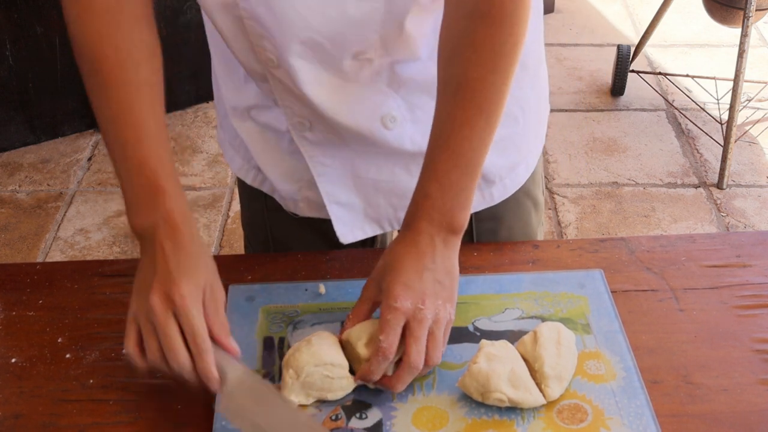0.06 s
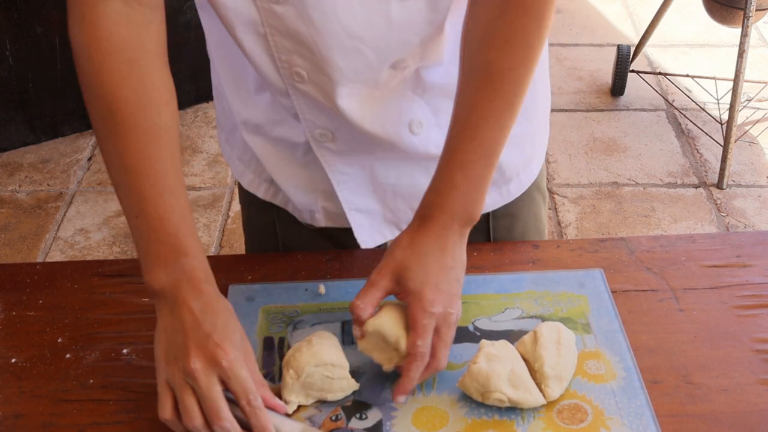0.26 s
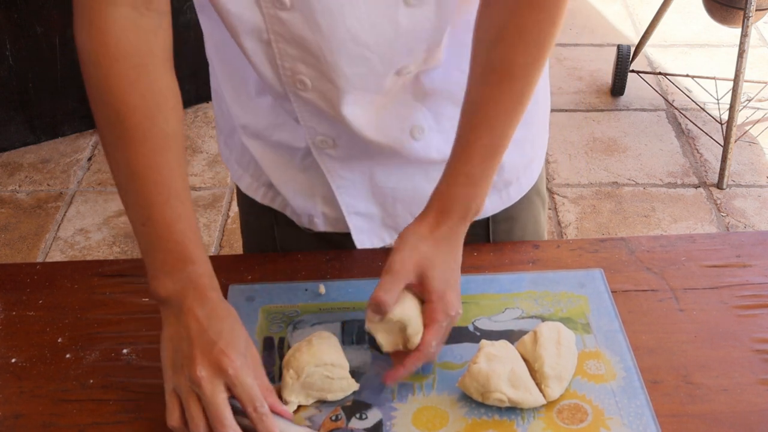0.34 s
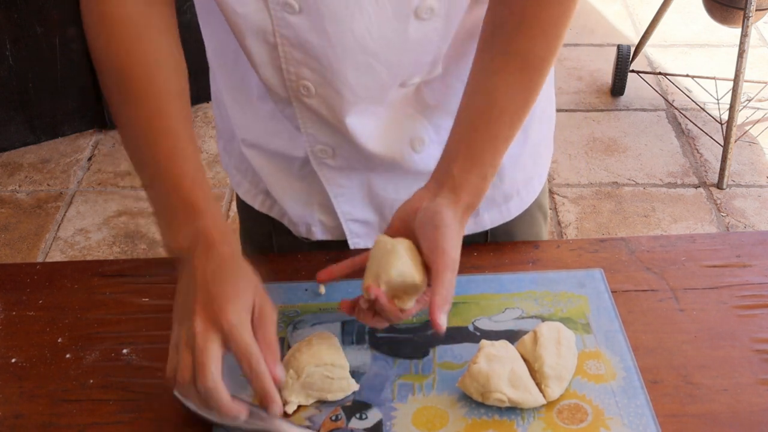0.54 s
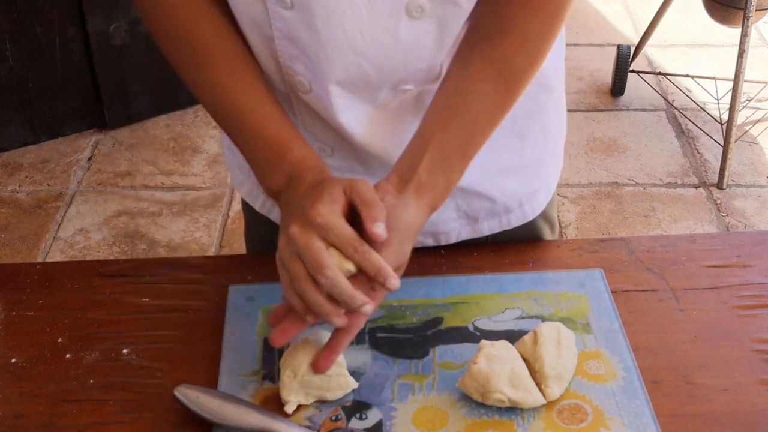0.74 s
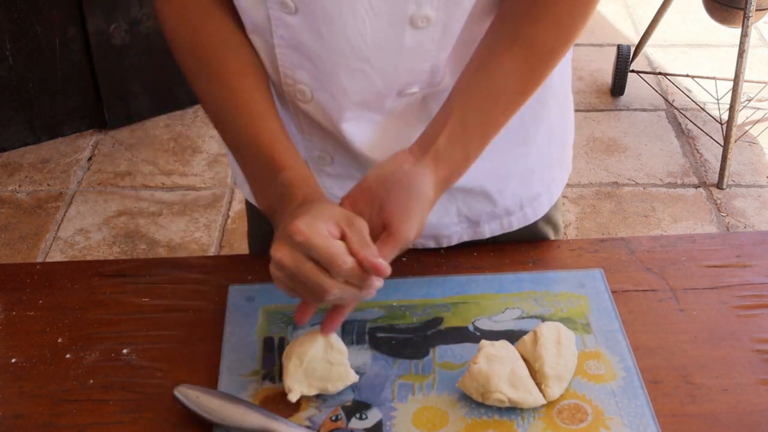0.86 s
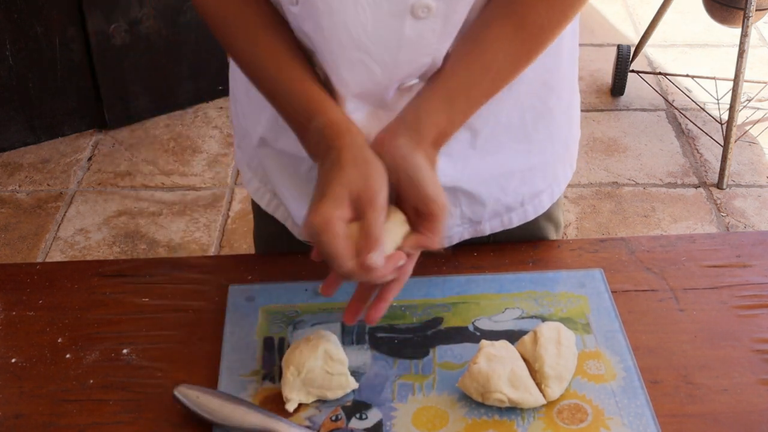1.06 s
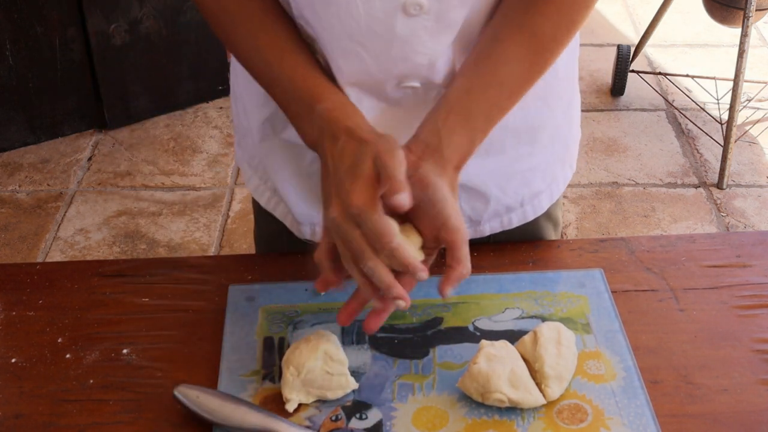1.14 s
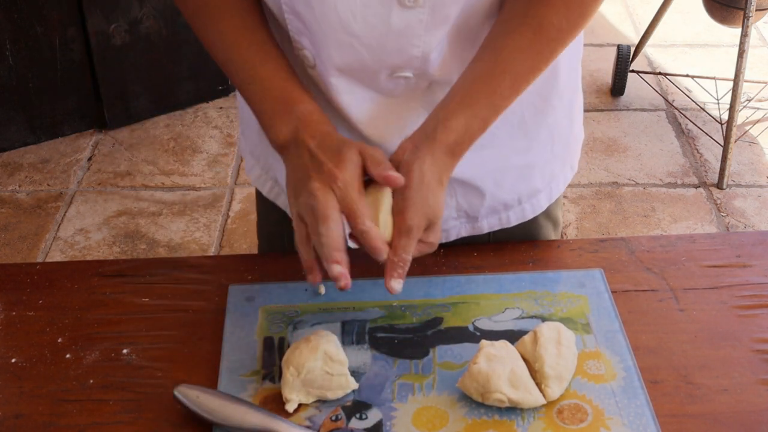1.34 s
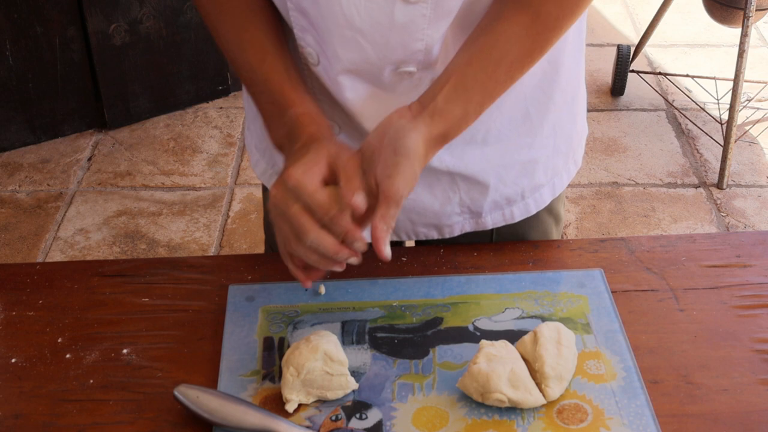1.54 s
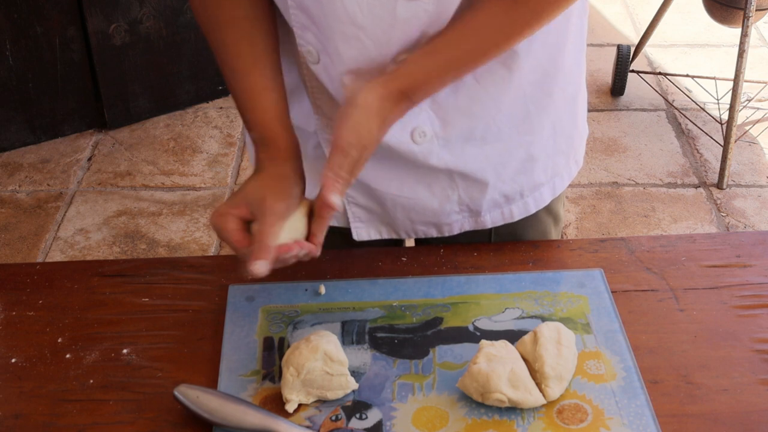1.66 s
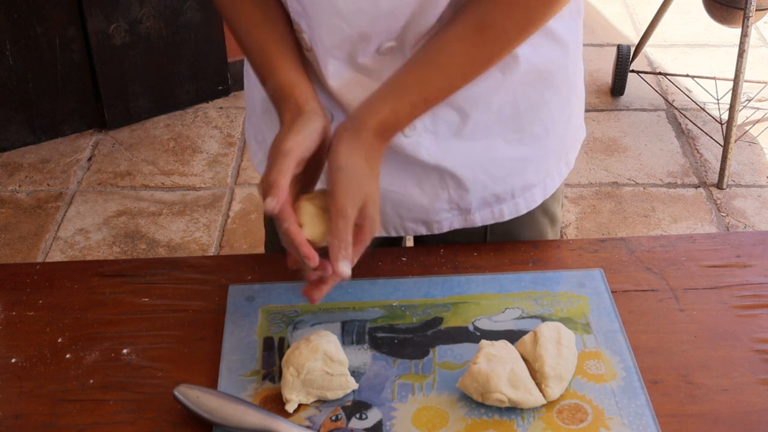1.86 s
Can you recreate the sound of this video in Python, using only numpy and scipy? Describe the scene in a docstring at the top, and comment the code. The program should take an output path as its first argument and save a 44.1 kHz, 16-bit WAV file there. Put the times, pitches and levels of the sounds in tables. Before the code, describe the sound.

A steel knife clatters onto a cutting board on a wooden table. At about 0.25 seconds the tip taps and rings, the blade skids and chatters, and near 0.45 the handle thumps down, stopping the ring and leaving a short echo. From 0.7 to 1.9 seconds hands roll dough in faint, uneven swishes, with one small tick near the start. A quiet, steady outdoor rush lies underneath.

```python
"""Putting down a knife, rolling dough

A steel kitchen knife is laid on a cutting board on a wooden table. The tip taps and rings,
the blade skids and chatters, then the handle drops, bounces and stops the ringing.
Hands then roll a lump of dough in soft swishes.
Nearby walls give the knife a short echo, over a steady outdoor rush."""
import sys
import numpy as np
from scipy import signal
from scipy.fft import rfft, irfft
from scipy.io import wavfile

SR = 44100
rng = np.random.default_rng(int(sys.argv[2]) if len(sys.argv) > 2 else 0)


def transcribe(signal):
    """Save signal, clipped to [-1, 1], as a 16-bit WAV file at the path in sys.argv[1]."""
    frames = np.atleast_2d(signal).T
    limited = np.clip(frames, -1, 1)
    pcm = np.round(limited * 32767).astype(np.int16)
    wavfile.write(sys.argv[1], SR, pcm)


N = 83790
T = np.arange(N) / SR


def gain(db):
    """Turn decibels into a number to multiply by."""
    return 10 ** (np.asarray(db) / 20)


def fade(fade_s):
    """Die away by 60 dB in fade_s seconds."""
    return np.exp(-np.log(1000) * T / fade_s)


def delay(x, start_s):
    """The same sound, starting later."""
    return np.concatenate([np.zeros(int(max(start_s, 0) * SR)), x])[:N]


def cut(x, hz, keep):
    """Keep the "low" or the "high" side of a pitch."""
    return signal.sosfilt(signal.butter(2, min(hz, .45 * SR), keep, fs=SR, output="sos"), x)


def noise(colour, grain_db=0):
    """Noise of strength 1, shaped by (pitch_hz, level_db) rows; grain_db makes it gritty."""
    hz, db = np.array(colour).T
    freqs = np.maximum(np.fft.rfftfreq(N, 1 / SR), 1)
    white = rng.standard_normal(N)
    grain = gain(grain_db * np.repeat(rng.standard_normal(N), 16)[:N])
    shape = gain(np.interp(np.log(freqs), np.log(hz), db))
    edge_cut = np.sqrt((1 + (freqs / hz[-1] / 1.1) ** 16) * (1 + (.7 * hz[0] / freqs) ** 4))
    shaped = irfft(rfft(white * grain) * shape / edge_cut, N)
    return shaped / np.sqrt(np.mean(shaped ** 2))


def ring(tones):
    """Fading tones from (pitch_hz, level_db, fade_s) rows; neighbours swing opposite ways."""
    t = T[:SR // 2]
    swings = sum((-1) ** k * gain(db - 60 * t / fade_s) * np.sin(2 * np.pi * hz * t)
                 for k, (hz, db, fade_s) in enumerate(tones))
    return np.pad(swings, (0, N - len(t)))


def strokes(rows, roundness=1.5):
    """Loudness of sliding strokes that rise and fall; roundness 1 is pointed, 2 is a bell."""
    power = np.zeros(N)
    for peak_s, db, rise_s, fall_s in rows:
        distance = np.abs(T - peak_s) / np.where(T < peak_s, rise_s, fall_s)
        power += gain(db) ** 2 * np.exp(-distance ** roundness)
    return np.sqrt(power)


def resonate(x, response):
    """Give every moment of a sound an echo or ring, scaled to an energy of 1."""
    return signal.fftconvolve(x, response / np.sqrt(np.sum(response ** 2)))[:N]


# Tone colours of the outdoor rush and hiss: pitch_hz, level_db
RUSH_COLOUR = [(15, -41), (25, -17), (129, -1.5), (161, -5.5), (185, -4.5), (366, -10.5), (430, -9.5),
               (939, -12.5), (1020, -14.5), (1170, -14.5), (3000, -30), (3900, -61), (6600, -120)]
HISS_COLOUR = [(1500, -27), (2800, -1.5), (3400, 0), (5000, -7), (7000, -13), (10000, -17), (16000, -27)]

def outdoor_air(rush_db=-37.5, hiss_db=-56.5):
    """A steady low rush with a faint hiss above it."""
    return gain(rush_db) * noise(RUSH_COLOUR) + gain(hiss_db) * noise(HISS_COLOUR)


# Tone colour of the echo: pitch_hz, level_db
ECHO_COLOUR = [(100, 1), (250, 3), (450, 2), (700, 9), (1000, 1), (1500, 0), (3000, -1), (4200, -1),
               (5800, -7), (7500, -2.5), (10000, -7.5), (16000, 3.5)]

def wall_echo(x, level_db=-6.5, build_s=0.014, escape_s=0.18):
    """Sound bounces between nearby walls and soon escapes to the open air."""
    build = 1 - np.exp(-(T / build_s) ** 2)
    escape = np.exp(-(T / escape_s) ** 2)
    tail = noise(ECHO_COLOUR) * fade(0.59) * build * escape
    return gain(level_db) * resonate(x, tail)


# Palms sliding over dough: peak_s, level_db, rise_s, fall_s, rub_db (compared with the hiss)
SWISHES = [(0.005, -63.5, 0.0068, .025, 11), (0.17, -63, 0.12, 0.1, -3), (0.712, -56, .005, 0.0088, -10),
           (0.765, -59.5, 0.014, .015, 6.5), (0.848, -47.5, .028, 0.03, -4.5),
           (0.945, -57, 0.028, 0.027, -2.5), (1.04, -63, .06, 0.098, -2), (1.142, -42, 0.011, .018, -3.5),
           (1.2, -53, 0.034, 0.076, -5.5), (1.36, -63.5, .03, 0.061, -3), (1.508, -56.5, 0.011, .014, 1),
           (1.565, -51.5, 0.017, 0.022, -10), (1.602, -47.5, 0.018, 0.013, -18),
           (1.66, -62, .03, 0.028, -4), (1.77, -61, 0.034, .04, -6), (1.862, -50, 0.015, .05, -12)]
# Tone colours of the skin's hiss and the softer rub: pitch_hz, level_db
SKIN_COLOUR = [(3000, -12), (6000, -5), (9500, -2), (12000, -0.5), (14500, 0), (16000, 3)]
RUB_COLOUR = [(1000, -20), (2500, -4.5), (4200, 4.5), (7000, -1), (9000, -2)]
# When the hands meet: start_s, level_db
TICKS = [(0.743, -36)]
# Tones of that tick: pitch_hz, level_db, fade_s
TICK_TONES = [(3110, -2, 0.017), (3400, 0, 0.018), (5100, -2.5, 0.013), (6470, 1, .016), (7470, -2.5, 0.01),
              (9800, -15, 0.0092), (11800, -7, .012)]

def hands():
    """Skin hisses over dough, pressing palms rub, and the hands meet with one small tick."""
    hiss = strokes(row[:4] for row in SWISHES) * noise(SKIN_COLOUR, grain_db=1)
    presses = [(peak_s, db + rub_db, rise_s, fall_s) for peak_s, db, rise_s, fall_s, rub_db in SWISHES]
    rub = strokes(presses) * noise(RUB_COLOUR, grain_db=2)
    tick = ring(TICK_TONES) + gain(-6) * noise(SKIN_COLOUR) * fade(.012)
    return hiss + rub + sum(gain(db) * delay(tick, start_s) for start_s, db in TICKS)


# Tones of the wooden table top: pitch_hz, level_db, fade_s
TABLE_TONES = [(135, -2, 0.037), (205.6, 1.5, 0.083), (303, -3.5, 0.052), (452, -6, 0.069),
               (680, -8, 0.043)]

def table_thump(rise_s=0.0023):
    """The table top answers a knock with a low thump."""
    return gain(-27.5) * ring(TABLE_TONES) * (1 - np.exp(-T / rise_s))


# Clear tones of the steel, one list each: pitch_hz, level_db, fade_s
STEEL_HZ = [1542, 1600, 2472, 3528, 4830, 5565, 6293, 6712, 8592, 9610, 10160, 11830, 12610, 14500]
STEEL_DB = [6, -5, -9, -11.5, -27, -12.5, -16.5, -15, -23, -15, -13, -10, -12, -27]
STEEL_FADE_S = [0.14, 0.24, 0.27, 0.18, 0.22, 0.17, 0.16, 0.43, 0.4, 0.14, 0.094, 0.07, 0.091, .14]

def steel_ring(count=50, low_hz=2700, high_hz=15670, db_per_octave=-3):
    """Struck steel rings with clear tones plus a shimmer of many weak, closely spaced ones."""
    clear = gain(-27.5) * ring(zip(STEEL_HZ, STEEL_DB, STEEL_FADE_S))
    pitch_dice, level_dice, fade_dice = rng.random((count, 3)).T
    hz = low_hz + (high_hz - low_hz) * (np.arange(count) + pitch_dice) / count
    db = -50 + db_per_octave * np.log2(hz / low_hz) + 10 * (level_dice - .5)
    shimmer = ring(zip(hz, db, 0.15 * (.5 + fade_dice)))
    return clear + shimmer


# The blade sliding on the board: peak_s, level_db, rise_s, fall_s
SKIDS = [(0.284, -57, .004, .008), (0.300, -35, 0.0087, 0.011), (0.318, -36, 0.013, 0.0046),
         (0.335, -34, 0.0033, 0.012), (0.415, -59, 0.022, 0.022)]
# Tone colour of the scraping: pitch_hz, level_db
SKID_COLOUR = [(200, -2), (1500, 8.5), (4000, 5), (6500, -2), (8300, -6.5), (10200, -5.5), (13000, -11),
               (16000, -20)]

def blade_skid(steel, sing_above_hz=5200):
    """Gritty scraping on the board keeps the blade's high tones singing."""
    scrape = strokes(SKIDS) * noise(SKID_COLOUR, grain_db=3)
    return scrape + gain(1.5) * resonate(scrape, cut(steel, sing_above_hz, "high"))


# Low tones of the bending blade, one list each: pitch_hz, level_db
FLEX_HZ = [211, 293, 432, 645, 857]
FLEX_DB = [-3.5, -2.5, -1, 2, -13]

def blade_flex(rise_s=0.0066, hold_s=0.073):
    """The blade bends while its tip rests on the board, and buzzes briefly."""
    swell = (1 - np.exp(-T / rise_s)) * np.exp(-(T / hold_s) ** 2)
    buzz = sum(gain(db) * np.sin(2 * np.pi * hz * T) for hz, db in zip(FLEX_HZ, FLEX_DB))
    return gain(-31.5) * swell * buzz


# Tones of knife against board, one list each: pitch_hz, fade_s
CLACK_HZ = [895, 1000, 1200, 1385, 1580, 1730, 1900, 2095, 2340, 2690, 2940, 3400, 3650, 4050, 4375, 4840,
            5640, 5980, 10050, 11830]
CLACK_FADE_S = [0.029, 0.033, 0.038, 0.029, 0.023, 0.028, 0.034, 0.043, 0.018, 0.016, 0.02, 0.017, 0.029,
                0.033, 0.072, 0.039, 0.034, .025, .018, 0.019]
TIP, BLADE, HANDLE = 0, 1, 2
# Strength of those tones, one row for each part of the knife: level_db
CLACK_DB = [
    [-8.5, -36, -5, 3, 3, -2, -29, -21, -13, 2.5, -17, -6, -1, -16, -15, -38, -10, -25, -7, -8],
    [-27, -39, -15.5, 0, -6, -8, -7.5, -5.5, -2, -0.5, -7, -8, -3.5, -10.5, -18.5, -10.5, -7, -6.5, -26,
     -30],
    [-1, -7.5, -10, -7.5, 1.5, -2.5, -17, -23, -2, -12, -19, -3, -25, -4, -16, -11, -6.5, -1, -34, -36],
]
# Tone colour of the sharp crack: pitch_hz, level_db
CRACK_COLOUR = [(400, -17), (750, -7.5), (1500, -0.5), (3500, -6), (5000, -11.5), (7000, -12),
                (8300, -18.5), (11000, -15.5), (16000, -30)]

def board_hit(part, cutoff_hz):
    """One part of the knife hits the board with a clack and a crack; cutoff_hz sets the brightness."""
    clack = gain(-15) * ring(zip(CLACK_HZ, CLACK_DB[part], CLACK_FADE_S))
    crack = gain(-14.5) * noise(CRACK_COLOUR) * fade(0.028)
    return cut(clack + crack, cutoff_hz, "low")


# Each landing of the knife: start_s, level_db, part, cutoff_hz, thump_db, ring_db
LANDINGS = [(0.2483, -3.5, TIP, 15420, -16, 5), (0.2495, -2.5, TIP, 5905, 5.5, -9.5),
            (0.3439, 0.5, BLADE, 8900, -26, -19), (0.3464, -8, BLADE, 6640, -8, 5.5),
            (0.3499, 0, BLADE, 7000, 3, -18), (0.3891, -5, BLADE, 11900, -20, -8),
            (0.3919, -8, BLADE, 8000, 6, -14), (0.4460, 5, HANDLE, 1950, 5.5, -12),
            (0.4514, -2.5, HANDLE, 6000, 6, -22), (0.4535, -2.5, BLADE, 6800, 7, -20),
            (0.4613, -7.5, HANDLE, 8500, 2, -8), (0.4637, -4, BLADE, 6000, -10, -20),
            (0.4683, -4.5, HANDLE, 5850, 5.5, -20)]

def knife(mute_start_s=0.439, mute_fade_s=0.057):
    """Each landing knocks the board, thumps the table and rings the steel, until the handle mutes it."""
    thump, steel = table_thump(), steel_ring()
    knocks, ringing = np.zeros(N), blade_skid(steel)
    for start_s, db, part, cutoff_hz, thump_db, ring_db in LANDINGS:
        knock = board_hit(part, cutoff_hz) + gain(thump_db) * thump
        knocks += gain(db) * delay(knock, start_s)
        ringing += gain(db + ring_db) * delay(steel, start_s)
    buzz = delay(blade_flex(), LANDINGS[0][0])  # starts with the first tap
    mute = gain(-60 * np.maximum(T - mute_start_s, 0) / mute_fade_s)
    return cut(knocks + buzz + mute * ringing, hz=110, keep="high")


def scene():
    """The knife and its echo, the hands and the outdoor air, in one channel."""
    clatter = knife()
    return (clatter + wall_echo(clatter) + hands() + outdoor_air())[None]


def record(dry):
    """Cut away the highest treble, above 16000 Hz."""
    return signal.sosfilt(signal.ellip(10, .2, 80, 16000, fs=SR, output="sos"), dry)


dry = scene()
out = record(dry)
transcribe(out)
```